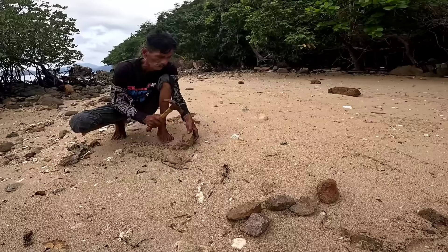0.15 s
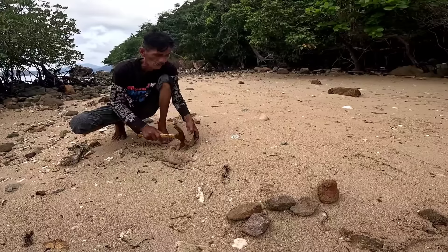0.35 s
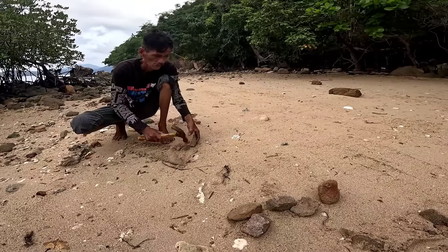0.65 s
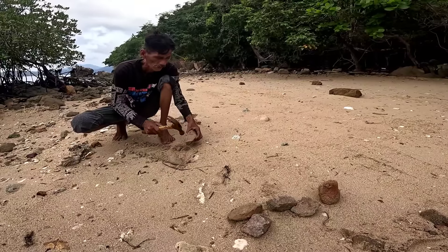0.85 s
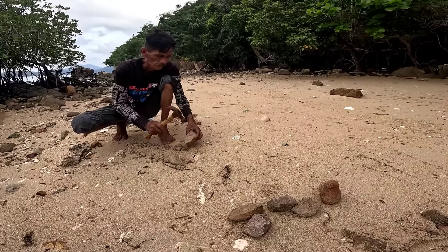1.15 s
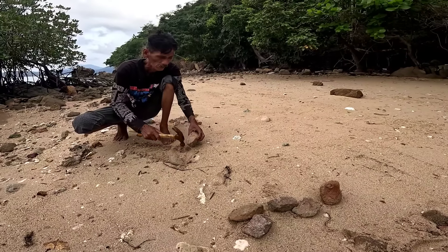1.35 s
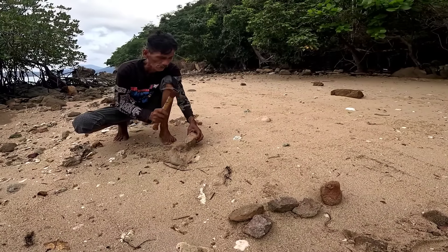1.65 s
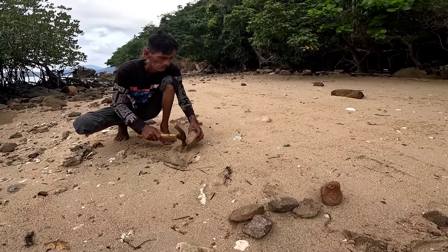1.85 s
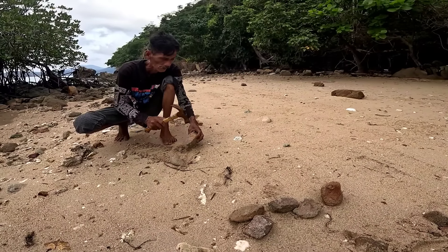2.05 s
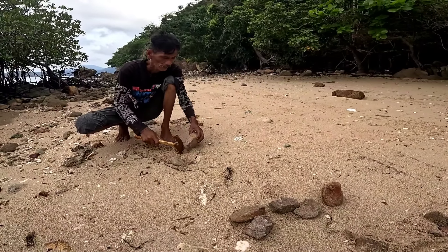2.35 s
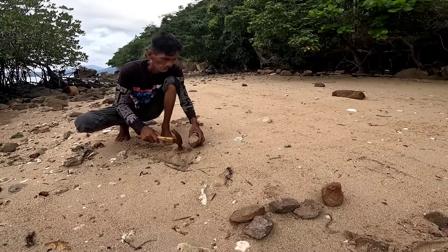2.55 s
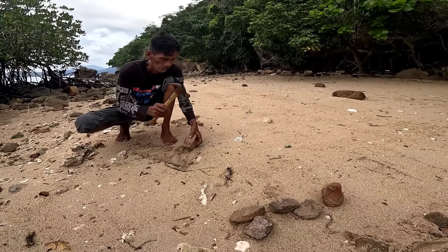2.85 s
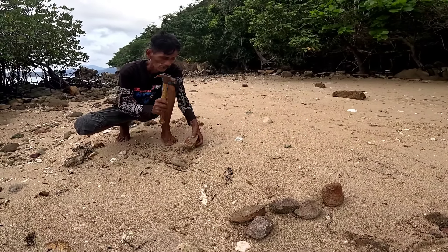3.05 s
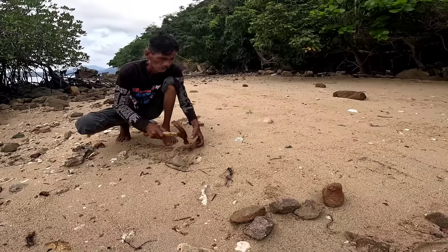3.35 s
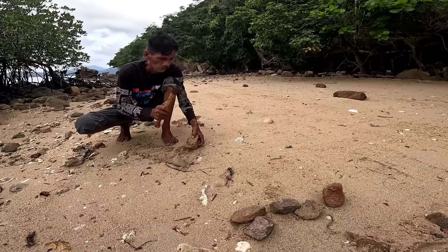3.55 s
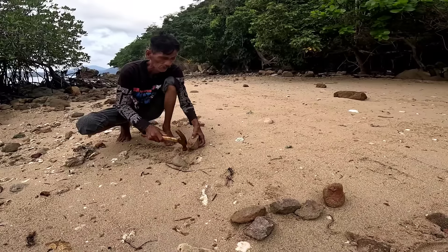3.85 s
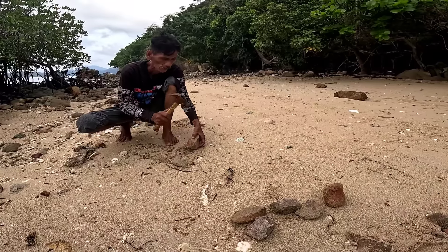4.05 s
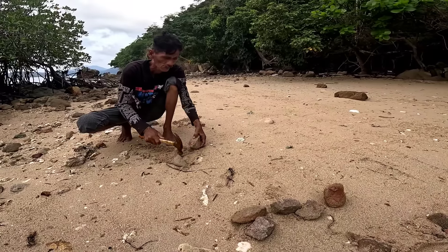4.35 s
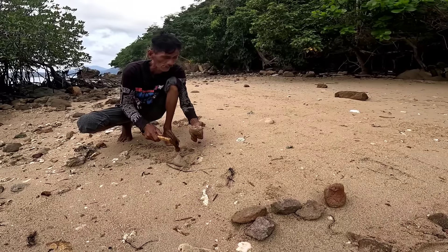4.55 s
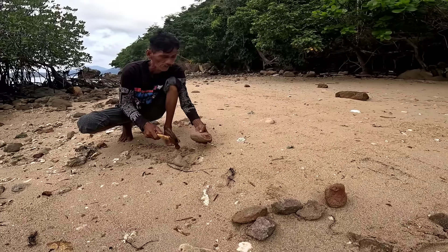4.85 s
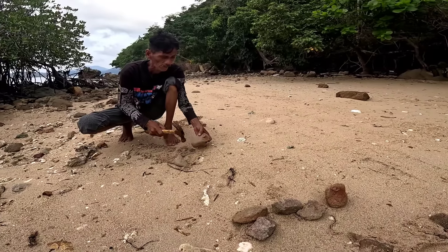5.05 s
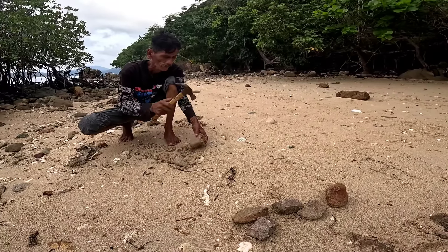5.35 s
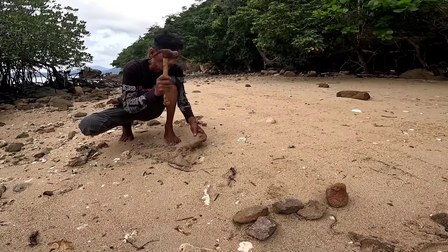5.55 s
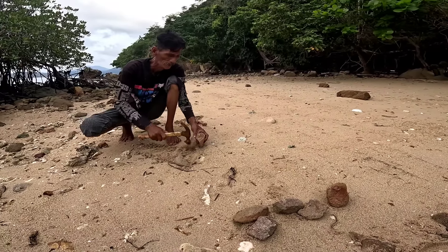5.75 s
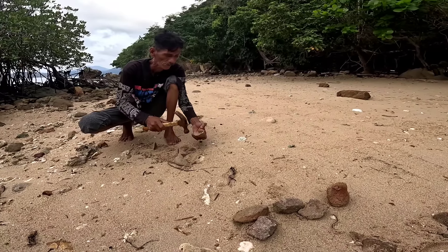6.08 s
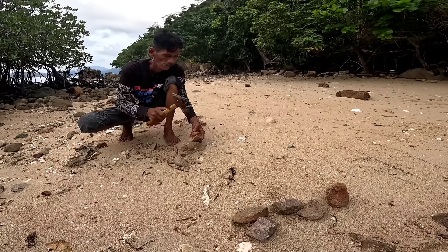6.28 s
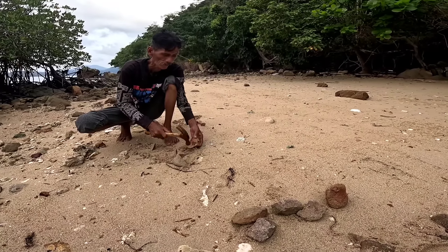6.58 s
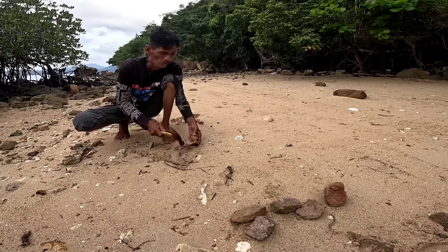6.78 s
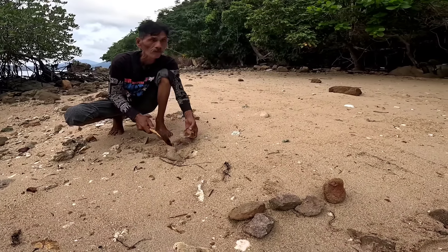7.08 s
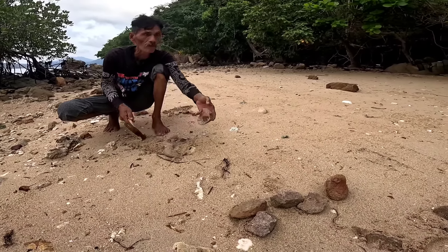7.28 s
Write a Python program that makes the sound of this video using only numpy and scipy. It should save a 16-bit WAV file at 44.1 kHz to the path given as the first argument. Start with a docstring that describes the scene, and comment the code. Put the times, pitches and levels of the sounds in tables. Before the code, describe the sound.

A hammer cracks sharply on a hand-held stone, about a dozen irregular blows with duller knocks between, over low engine-like hum and wind on a beach.

```python
"""Hammer on stone, sandy shore

A hammer cracks down on a hand-held stone. Each blow is a clack of damped modes and grit, with brief iron and
stone rings, a low sand thud and decaying noise as forest echo. Softer nudges and showers of sand grains follow.
Underneath: wavering low tones and a dull drone like a far boat engine, shaped noise for wind, water and leaves,
narrow noise for insects, gliding sines for bird whistles. A limiter and a clipper hold the peaks."""
import sys
import numpy as np
from scipy import signal
from scipy.fft import rfft, irfft, next_fast_len
from scipy.io import wavfile
from scipy.ndimage import uniform_filter1d, minimum_filter1d

SR = 44100
rng = np.random.default_rng(int(sys.argv[2]) if len(sys.argv) > 2 else 0)


def master_out(mix):
    """Clip the mix to full scale and print it as 16-bit PCM to the path in sys.argv[1]."""
    frames = np.transpose(np.atleast_2d(mix))
    ceiling = np.clip(frames, -1, 1)
    pcm = np.round(ceiling * 32767).astype(np.int16)
    wavfile.write(sys.argv[1], SR, pcm)


N = 327222
T = np.arange(N) / SR
AGE = T[:4096]  # s since a hit
ECHO_AGE = T[:24576]  # s since an echo began
IMPULSE = 1.0 * (AGE == 0)


def undb(db):
    """Decibels to gain."""
    return 10 ** (np.asarray(db) / 20)


def unit(x):
    """Scale to rms 1."""
    return x / np.sqrt(np.mean(x ** 2))


def burst(x, seconds):
    """Scale a hit to the energy of rms 1 held for so many seconds."""
    return x * np.sqrt(seconds * SR / np.sum(x ** 2))


def add(out, start_s, x):
    """Mix x into out from start_s."""
    i = max(int(start_s * SR), 0)
    out[i:i + len(x)] += x[:N - i]


def gains(points, n):
    """Gain of (Hz, dB) points at the bins of an n-point transform."""
    hz, db = np.transpose(points)
    bin_hz = np.arange(n // 2 + 1) * SR / n
    return undb(np.interp(np.log(bin_hz + 1), np.log(hz), db))


def noise(points):
    """Steady noise of rms 1 with a spectrum of (Hz, dB) points."""
    n = next_fast_len(N, True)
    spectrum = rfft(rng.standard_normal(n)) * gains(points, n)
    return unit(irfft(spectrum, n)[:N])


def colour(x, points, size=512):
    """Short causal (minimum-phase) filter with a response of (Hz, dB) points."""
    cepstrum = irfft(np.log(gains(points, size)))[:size // 2]
    cepstrum[1:] *= 2
    impulse_response = irfft(np.exp(rfft(cepstrum, size)))
    return signal.fftconvolve(x, impulse_response)[:len(x)]


def resonate(x, hz, q):
    """One broad resonance."""
    b, a = signal.iirpeak(min(hz, SR / 4), q, fs=SR)
    return signal.lfilter(b, a, x)


def walk(rate_hz, size=N):
    """Slow random wander with a spread near 1."""
    at = np.arange(size) * (rate_hz / SR)
    knots = rng.standard_normal(int(at[-1]) + 2)
    return np.interp(at, np.arange(len(knots)), knots)


def glide(hz):
    """Sine that follows a varying pitch."""
    return np.sin(2 * np.pi * np.cumsum(hz) / SR)


def fade(t60_s, age=AGE):
    """Exponential decay, 60 dB in t60_s."""
    return np.exp(-np.log(1000) * age / t60_s)


def hum(drone_db=-45.0, waver=0.004, waver_hz=4.3):
    """A few low engine-like tones waver over a dull drone."""
    # low tones: pitch_hz, level_db
    hum_tones = [(80.7, -50), (118, -58), (177.4, -51)]
    # drone spectrum: freq_hz, gain_db
    drone_spectrum = [(20, -3), (50, -6), (90, -0.5), (125, -1.5), (150, -13.5), (180, -5), (220, -12),
                      (260, -27), (350, -31), (550, -38), (1000, -59), (8000, -110)]
    out = undb(drone_db) * noise(drone_spectrum)
    for hz, db in hum_tones:
        out += undb(db) * unit(glide(hz * (1 + waver * walk(waver_hz))))
    return out


def shore(eddy_db=3.5, eddies_per_s=8, air_db=-76, air_spread_db=2.3):
    """Gusts, broken up by eddies, buffet the microphone; faint water and leaves hiss."""
    # wind spectrum: freq_hz, gain_db
    gust_spectrum = [(15, 2), (35, 4), (60, -5.5), (100, -11), (200, -26), (400, -46.5), (1000, -79),
                     (8000, -120)]
    # wind strength before eddies: time_s, level_db
    wind_strength = [(0.0, -44.5), (0.77, -44.5), (0.98, -37), (1.61, -38.5), (1.82, -42.5), (2.87, -48.5),
                     (3.01, -36), (3.29, -31), (4.48, -45), (5.04, -30), (5.32, -32.5), (5.6, -30.5),
                     (5.74, -33.5), (6.23, -27.5), (6.44, -38), (6.86, -42.5), (7.07, -35.5), (7.42, -41)]
    # water and leaf hiss spectrum: freq_hz, gain_db
    air_spectrum = [(100, -6.5), (600, -1), (1400, 2.5), (2500, -0.5), (4500, -7), (7500, -15.5),
                    (10000, -21), (16000, -37.5)]
    strength_db = np.interp(T, *np.transpose(wind_strength))
    wind = noise(gust_spectrum) * undb(strength_db + eddy_db * walk(eddies_per_s))
    air = noise(air_spectrum) * undb(air_db + air_spread_db * walk(1))
    return wind + air


def buffets():
    """Eddies hit the microphone as short, low thumps: octave-wide noise under a smooth swell."""
    # sudden buffets: start_s, length_s, centre_hz, level_db
    buffet_events = [(5.864, 0.14, 100, -32), (6.061, 0.074, 93, -34.5), (6.171, 0.071, 49.6, -24.5),
                     (6.18, 0.093, 143, -38)]
    out = np.zeros(N)
    for start_s, length_s, hz, db in buffet_events:
        n = int(length_s * SR)
        band_hz = [hz / np.sqrt(2), hz * np.sqrt(2)]
        octave = signal.butter(3, band_hz, "band", fs=SR, output="sos")
        eddy = signal.sosfilt(octave, rng.standard_normal(n + len(AGE)))  # extra samples let the filter settle
        add(out, start_s, undb(db) * unit(eddy[-n:] * np.hanning(n)))
    return out


def shrill(hz, q=5.0):
    """The narrow hiss of many insects: noise through one resonance twice."""
    return unit(resonate(resonate(rng.standard_normal(N), hz, q), hz, q))


def insects(chorus_hz=6100, chorus_db=-80.5, swell_sigma_s=0.079, flicker_db=1.7, flicker_hz=68):
    """A faint chorus, out of which groups swell and sink; its level flickers."""
    # swells before flicker: middle_s, pitch_hz, peak_db
    swell_events = [(.27, 5900, -68), (1.05, 6250, -71.5), (3.08, 6500, -76), (3.62, 5850, -71),
                    (5.55, 5900, -77.5), (6.5, 5850, -66), (7.36, 5700, -72)]
    chorus = undb(chorus_db) * shrill(chorus_hz)
    for middle_s, hz, db in swell_events:
        swell = np.exp(-0.5 * ((T - middle_s) / swell_sigma_s) ** 2)
        chorus += undb(db) * swell * shrill(hz)
    return chorus * undb(flicker_db * walk(flicker_hz))


def forest_echo(x, t60_s=0.55, near_share=0.11, build_s=0.019, patchy_db=2.0):
    """Nearby rocks scatter the sound at once, then trunks and leaves join in and die away."""
    # forest response: freq_hz, gain_db
    forest_response = [(150, -11.5), (500, 0.5), (900, -5.5), (1400, 5.5), (2500, -0.5), (4500, -2.5),
                       (6500, -7), (9000, -13.5), (15000, -24)]
    size = len(ECHO_AGE)
    build_up = 1 - (1 - near_share) * np.exp(-(ECHO_AGE / build_s) ** 2)
    patches = undb(patchy_db * walk(90, size))
    scatter = rng.standard_normal(size) * build_up * fade(t60_s, ECHO_AGE) * patches
    return burst(signal.fftconvolve(colour(x, forest_response), scatter), 0.1)


def birds(waver=0.014, waver_hz=270, flutter_db=3, flutter_hz=110, echo_db=-19):
    """Thin, fluttering whistles glide in the trees, which blur them a little."""
    # whistles, pitches before waver: start_s, length_s, first_hz, middle_hz, last_hz, level_db
    bird_whistles = [(0.199, 0.32, 2930, 3990, 5314, -64.5), (1.098, 0.16, 1776, 1853, 1955, -53.5),
                     (1.207, 0.072, 1900, 1830, 1820, -45.5), (1.248, 0.069, 1730, 1500, 1337, -53.5),
                     (6.903, 0.077, 1470, 1470, 1490, -76), (6.934, 0.074, 1910, 1870, 1750, -54.5),
                     (7.151, 0.041, 1435, 1450, 1384, -62.5)]
    out = np.zeros(N)
    for start_s, length_s, first_hz, middle_hz, last_hz, db in bird_whistles:
        n = int(length_s * SR)
        path_hz = np.interp(np.linspace(0, 2, n), np.arange(3), [first_hz, middle_hz, last_hz])
        tone = glide(path_hz * (1 + waver * walk(waver_hz, n)))
        whistle = unit(tone * np.hanning(n) * undb(flutter_db * walk(flutter_hz, n)))
        add(out, start_s, undb(db) * whistle)
        add(out, start_s, undb(db + echo_db) * forest_echo(whistle))
    return out


def sand(shower_s=0.19, grain_chance=0.1, spread_db=4, thinning=5.1):
    """Sand thrown up patters down: loose grains of very unequal size, a quick shower that thins out."""
    # showers: start_s, level_db
    sand_showers = [(0.742, -64), (1.321, -59), (1.885, -67), (2.419, -63), (3.286, -50.5), (4.315, -57),
                    (5.091, -76), (6.041, -66), (6.734, -66), (7.31, -72)]
    # grain spectrum: freq_hz, gain_db
    grain_spectrum = [(300, -18.5), (1500, 2.5), (4000, 2.5), (7000, 0.5), (10000, -11), (16000, -20.5)]
    out = np.zeros(N)
    n = int(shower_s * SR)
    progress = np.linspace(0, 1, n)
    shower = np.sin(np.pi * progress) * np.exp(-thinning * progress)
    for start_s, db in sand_showers:
        landed = rng.random(n) < grain_chance
        size_gain = undb(spread_db * np.minimum(rng.exponential(size=n), 4))
        grains = landed * rng.standard_normal(n) * size_gain
        add(out, start_s, undb(db) * burst(colour(grains, grain_spectrum) * shower, 0.28))
    return out


def ring(modes, detune, scatter_db):
    """Damped modes; grip and striking point change their strength, sign and pitch each time."""
    out = np.zeros(len(AGE))
    for hz, db, t60_s in modes:
        strength, shift, sign = rng.standard_normal(3)
        tone = np.sin(2 * np.pi * hz * (1 + detune * shift) * AGE)
        out += np.sign(sign) * undb(db + scatter_db * strength) * fade(t60_s) * tone
    return out


def contact(x, hz, q, knock_db, treble_db):
    """A harder, shorter contact centres the energy higher; a loose stone adds a low knock."""
    return colour(resonate(x, hz, q), [(800, knock_db), (1600, 0), (3500, 0.00049), (6000, treble_db)])


def clack(crack_db=0, crack_t60_s=0.02, tick_db=-1):
    """A sharp tick and a crunch of crushed grit over the dead modes of stone and hammer."""
    # dead clack of stone against iron, before scatter: pitch_hz, level_db, t60_s
    clack_modes = [(499.8, -6, 0.034), (687, -9, 0.021), (780, -12.5, 0.025), (1105, -4, 0.017),
                   (1640, 0, .02), (2028, -3.5, 0.025), (2195, -7, 0.02), (2470, 2, 0.011),
                   (3150, -9.5, 0.013), (3570, -11.5, 0.027), (3960, -14.5, 0.022), (4710, -13, 0.029),
                   (6000, -15.5, 0.0047)]
    # tick and grit spectrum: freq_hz, gain_db
    crack_spectrum = [(150, -3), (500, -1), (1000, -1), (2500, 0), (6000, -2), (8000, -11), (11000, -18),
                      (16000, -14)]
    body = burst(ring(clack_modes, detune=0.011, scatter_db=1.0), 1)
    grit = burst(rng.standard_normal(len(AGE)) * fade(crack_t60_s), 0.91)
    tick = burst(IMPULSE, 1.0)
    return body + colour(undb(crack_db) * grit + undb(tick_db) * tick, crack_spectrum)


def off_ground(x, lag_s=0.00268, share=0.5):
    """The sand mirrors the sound a moment later, with less treble."""
    delayed = np.interp(AGE - lag_s, AGE, x, left=0)
    return x + share * colour(delayed, [(2500, -7.5), (6000, -7.5), (10000, -13.0)])


def sand_thud(hz=207, t60_s=0.045, rise_s=0.0032, bed_hz=145, bed_db=-6):
    """The stone sinks into its bed of damp sand and bounces; the bed gives a lower note."""
    swing = np.sin(2 * np.pi * hz * AGE) + undb(bed_db) * np.sin(2 * np.pi * bed_hz * AGE)
    return burst(-swing * fade(t60_s) * (1 - np.exp(-AGE / rise_s)), 0.0077)


def nudges(q=0.9, knock_db=8, thud_db=-10.5, echo_db=-27.5):
    """Hammer drops back or stone is nudged: a dull knock, no ring, slight thud, brief diffuse echo."""
    # light knocks; thud and echo are relative to level_db: start_s, level_db, contact_hz, treble_db
    nudge_events = [(.767, -36, 1240, -10), (1.082, -47, 700, -11.5), (1.683, -33, 614.5, -14.5),
                    (2.949, -31.5, 830, 4.5), (3.303, -26.5, 1600, -2.5), (3.622, -46, 510, -6.5),
                    (4.334, -30.5, 1585, 2), (5.207, -42.5, 630, 0), (5.258, -50.5, 823, 2.5),
                    (6.4827, -29, 1120, -9), (6.772, -39, 1780, 9), (6.961, -46.5, 974, -18),
                    (7.0301, -23.5, 1600, 1), (7.0696, -23.5, 836, -1)]
    out = np.zeros(N)
    for start_s, db, hz, treble_db in nudge_events:
        knock = contact(clack(crack_db=1, crack_t60_s=0.032), hz, q, knock_db, treble_db)
        near = burst(off_ground(knock), 0.013)
        pulse = contact(IMPULSE, hz, q, knock_db, treble_db)
        echo = forest_echo(pulse, t60_s=0.35, near_share=0.9)
        add(out, start_s, undb(db) * (near + undb(thud_db) * sand_thud()))
        add(out, start_s, undb(db + echo_db) * echo)
    return out


def first_touch(hz, length_s=0.0047, growth_s=0.00024):
    """Grit on the stone crushes as the hammer closes in, just before the full contact."""
    age = AGE[AGE < length_s]
    crush = resonate(rng.standard_normal(len(age)), hz, q=1.0)
    return burst(crush * np.exp((age - length_s) / growth_s), 0.0024)


def hardness(hz, firm_hz=2200):
    """Octaves by which a contact is brighter than an ordinary firm blow."""
    return np.log2(hz / firm_hz)


def blows(iron_echo_db=5.0, stone_echo_db=-5, touch_db=-18, echo_db=-31.5):
    """Each blow clacks, sets iron and stone ringing, thumps the sand and wakes the forest."""
    # hard blows; iron and thud are relative to strength_db:
    # start_s, strength_db, contact_hz, contact_q, knock_db, treble_db, iron_db, thud_db
    blow_events = [(0.0214, -8.5, 1800, 4, 5, 5.5, -14, -10),
                   (0.387, -3, 2275, 1.17, -2, -0.5, -6.5, -12.5),
                   (0.7414, -16, 2400, 0.55, 4.5, -4.5, -7, -6),
                   (1.3071, -8.5, 2618, 1.1, -2, -5, -11, -18.5), (1.8762, -7, 2690, 1.1, 0, -1.5, -21, -7),
                   (2.39, -6.5, 2800, 1.35, 5, -3.5, -19.5, -9),
                   (3.2802, -8, 1975, 0.75, -2, -1, -5.5, -20.5), (3.837, 1.5, 2960, 2.5, 8, -4, -31, -4.5),
                   (4.3005, -4.5, 2036, 3.1, 6, -6.5, -24.5, -8.5),
                   (5.8614, 2.5, 3430, 1.63, 11, -2, -27.5, -2),
                   (6.7197, -18.5, 1560, 1.2, 7.5, 1, -16, -11),
                   (6.7278, -16.5, 1580, 1.13, 15.5, 10.5, -9.5, -1)]
    # longer rings of hammer head and stone, before scatter: pitch_hz, level_db, t60_s
    iron_modes = [(3740, -3, 0.046), (6207, 0, 0.043), (8040, -17.5, 0.046)]
    stone_modes = [(4435, -1, 0.062), (4410, -9, 0.033)]
    stone_db, stone_db_per_oct = -22.5, 10.5  # a harder contact rings the stone more
    tick_lead_s, tick_db = 0.011, -26  # faint tick ahead of each blow
    out = np.zeros(N)
    for start_s, db, hz, q, knock_db, treble_db, iron_db, thud_db in blow_events:
        iron = undb(iron_db) * ring(iron_modes, detune=0.00073, scatter_db=4.0)
        stone_gain = undb(stone_db + stone_db_per_oct * hardness(hz))
        stone = stone_gain * ring(stone_modes, detune=0.0091, scatter_db=4.5)
        near = burst(off_ground(contact(clack(), hz, q, knock_db, treble_db)), 0.0076)
        pulse = burst(contact(resonate(IMPULSE, hz, q=0.25), hz, q, knock_db, treble_db), 0.01)
        echo = forest_echo(pulse + undb(iron_echo_db) * iron + undb(stone_echo_db) * stone)
        touch = first_touch(hz)
        add(out, start_s - tick_lead_s, undb(db + tick_db) * resonate(near, hz, q=0.67))
        add(out, start_s - len(touch) / SR, undb(db + touch_db) * touch)
        add(out, start_s, undb(db) * (near + iron + stone + undb(thud_db) * sand_thud()))
        add(out, start_s, undb(db + echo_db) * echo)
    return out


def scene():
    """All sources at one microphone."""
    background = hum() + shore() + buffets() + insects() + birds()
    return (background + sand() + nudges() + blows())[None]


def limiter(x, limit_db=-9.5, ratio=2.6, recovery_db_per_s=88.5, window_s=0.004):
    """Gain drops just ahead of a loud blow, then creeps back at a steady dB rate."""
    size = int(window_s * SR)
    level_db = 10 * np.log10(np.abs(uniform_filter1d(x ** 2, size)) + 1e-12)
    excess_db = np.minimum(limit_db - level_db, 0)
    needed_db = minimum_filter1d(excess_db, size) * (1 - 1 / ratio)
    # a running minimum against a rising ramp gives the linear recovery
    recovery_db = recovery_db_per_s * T
    gain_db = np.minimum.accumulate(needed_db - recovery_db, axis=-1) + recovery_db
    return x * undb(uniform_filter1d(gain_db, size))


def record(dry, ceiling=0.93, top_hz=16100):
    """The recorder limits the hardest blows, clips what still overshoots, then cuts the top."""
    low_pass = signal.ellip(10, 0.2, 90, top_hz, fs=SR, output="sos")
    clipped = np.clip(limiter(dry), -ceiling, ceiling)
    return signal.sosfilt(low_pass, clipped)


dry = scene()
out = record(dry)
master_out(out)
```